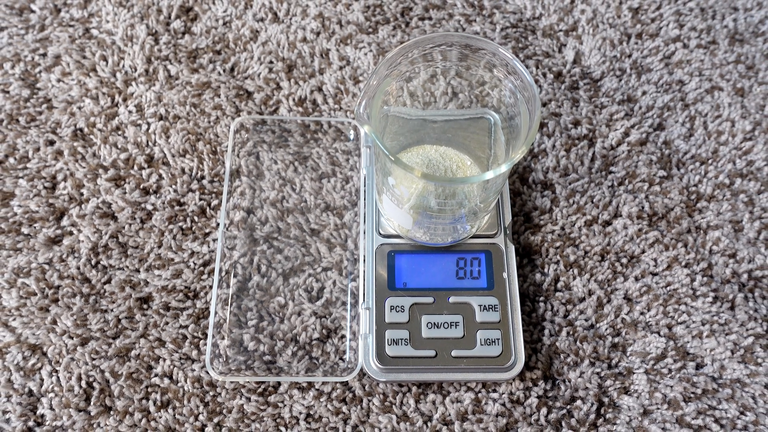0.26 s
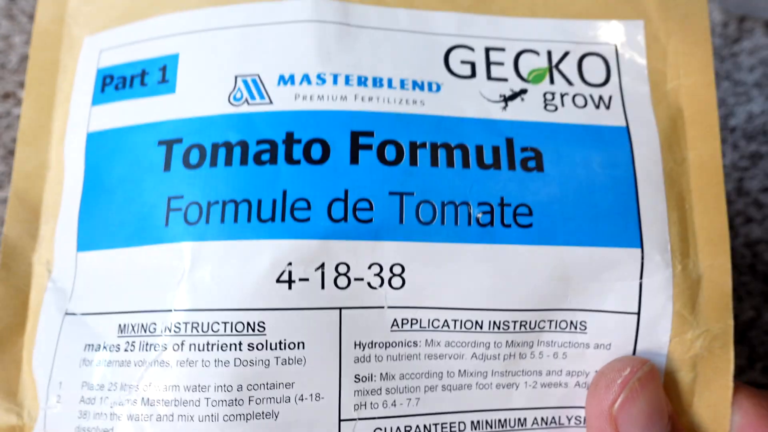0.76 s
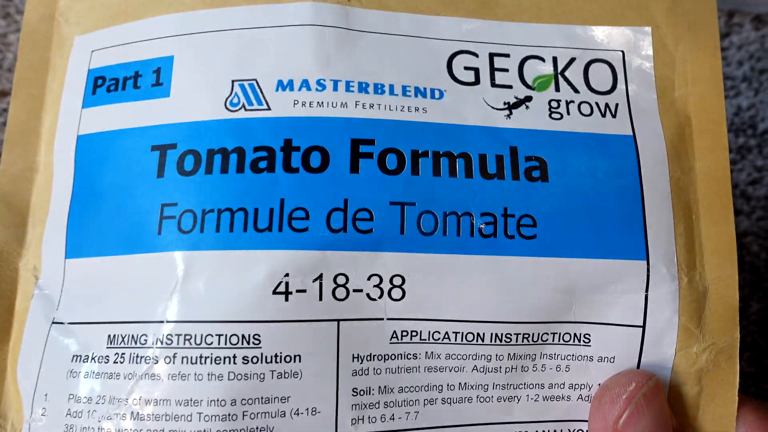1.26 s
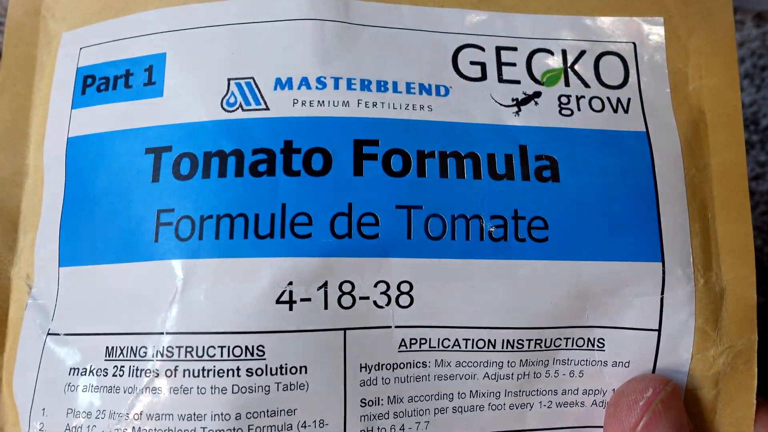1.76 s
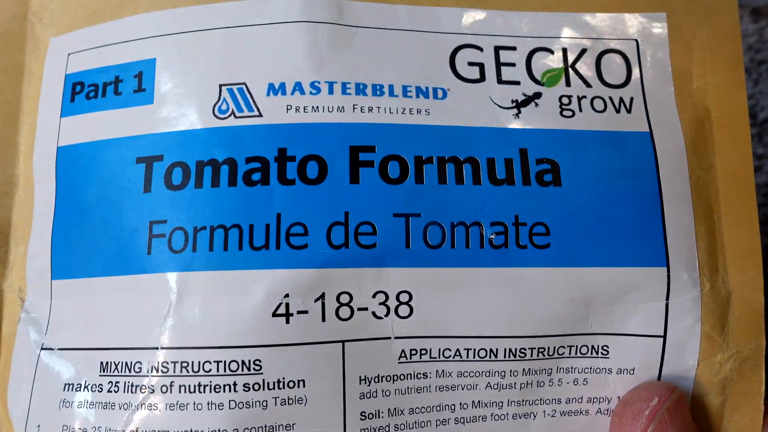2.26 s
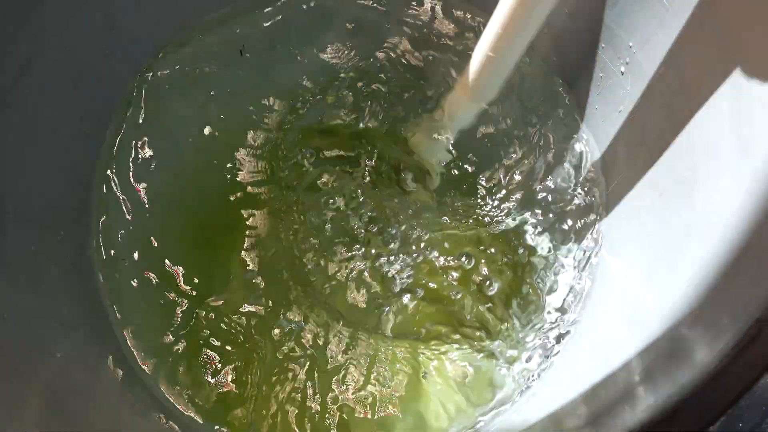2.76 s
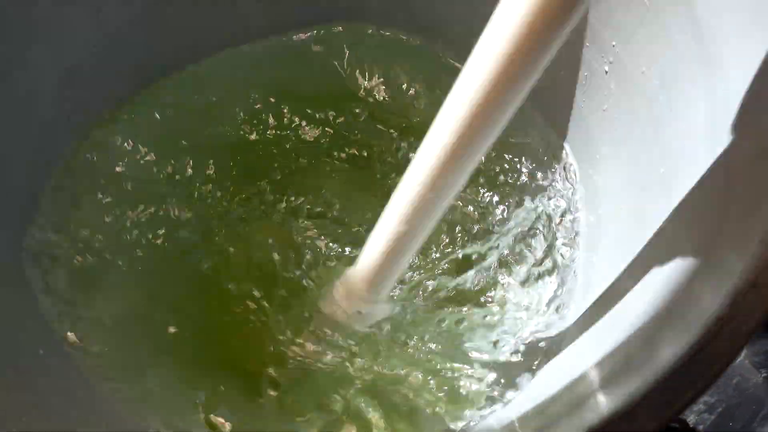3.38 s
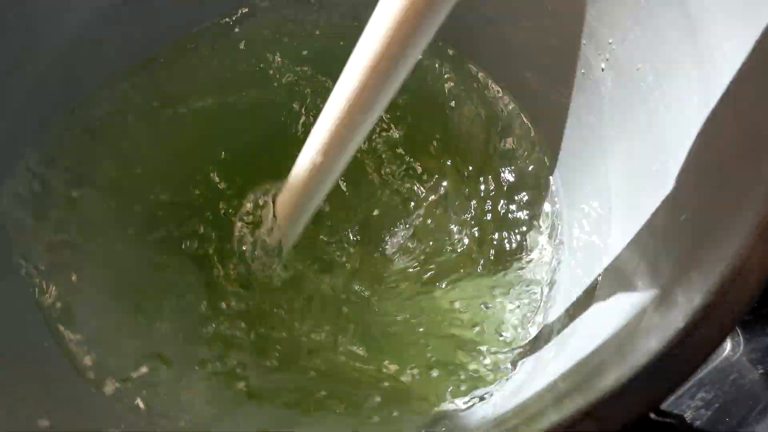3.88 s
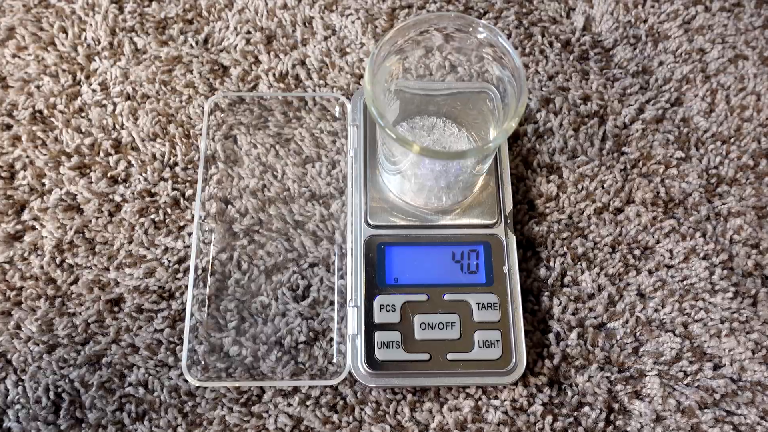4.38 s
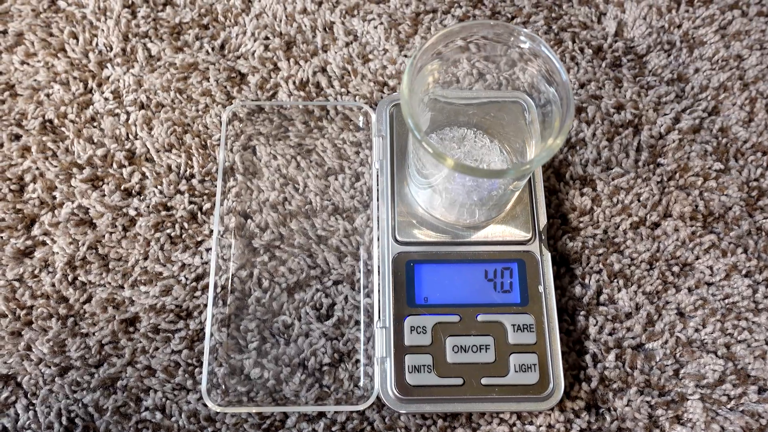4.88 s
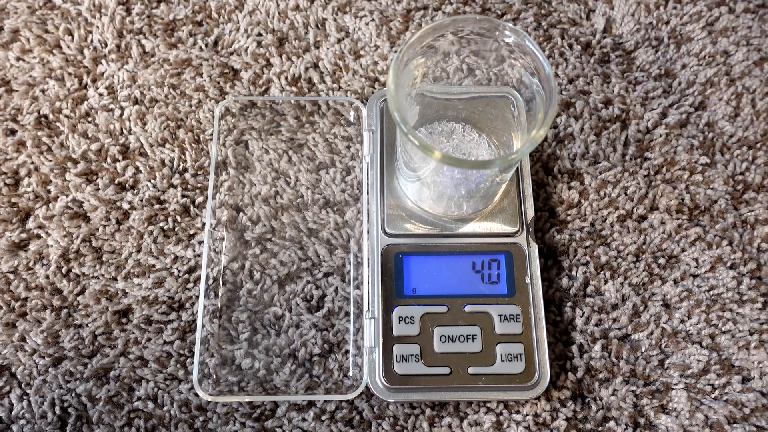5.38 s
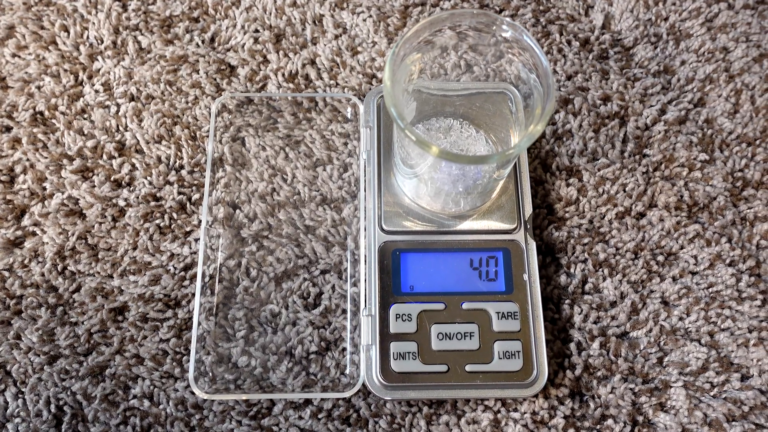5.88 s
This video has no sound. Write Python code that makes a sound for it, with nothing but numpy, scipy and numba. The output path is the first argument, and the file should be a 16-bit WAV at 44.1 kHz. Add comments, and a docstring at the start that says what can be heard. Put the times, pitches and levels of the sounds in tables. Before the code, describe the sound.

The scene opens on a quiet indoor room with low rumbling air and a very faint bird chirp outside. Around 0.4 seconds a paper pouch brushes past with a short dry rustle and a dull knock, fading by about 1 second. Calm room noise follows, with a tiny crease tick at 1.1 and thin distant chirps near 1.35 and 2.1. At 2.4 stirring cuts in abruptly, close and much louder: an opening rush, then irregular slaps, hollow low plops, burbling, ringing bubbles and small bright ticks, all coloured by the pail's short boxy resonance. It stops sharply at 4.4, leaving near silence. Room air rises a little after 5 seconds. From 5.3 paper rustles softly, with snaps at 5.5, a muffled bump at 5.62 and a sharp crack at 5.87. Fine granules tick on glass, clearest around 6.0 at the end.

```python
"""Indoors, plant food is mixed. A paper pouch swings past with a rustle and a bump: friction and impact noise.
A stick then stirs water in a plastic pail: air pockets slap shut and boom, bubbles ring as damped tones,
noise swishes, and the pail adds resonances and short echoes.
Then the quiet room returns, and granules (random impacts) and the pouch (dense tiny slips) start to rustle.
A bird chirps faintly outside in short noise bands, over a low noise of room air."""
import sys
import numpy as np
from scipy import signal
from scipy.fft import rfft, irfft
from scipy.io import wavfile
from numba import njit

SR = 44100
rng = np.random.default_rng(int(sys.argv[2]) if len(sys.argv) > 2 else 0)


def digitize_waveform(pressure):
    """Quantize a signal to 16-bit integers and store it at the path in sys.argv[1].

    Rows of a 2-D input are taken as channels; values are limited to [-1, 1].
    """
    field = np.atleast_2d(pressure).T
    bounded = np.clip(field, -1, 1)
    quanta = np.round(bounded * 32767).astype(np.int16)
    wavfile.write(sys.argv[1], SR, quanta)


N = 270140
T = np.arange(N) / SR  # time in the scene [s]
AGE = T[:SR // 4]  # time since the start of a short sound [s]
STIR_START_S, STIR_END_S = 2.377, 4.379
STIR_RATE_HZ = 2.5  # turns of the stick per second


def undb(db):
    """Level law: decibels to amplitude gain."""
    return 10 ** (np.asarray(db) / 20)


def unit(x):
    """Normalisation to an rms amplitude of 1."""
    return x / np.sqrt(np.mean(x ** 2))


def level_curve(table):
    """Level interpolation: (time [s], level [dB]) points become a gain for every sample."""
    s, db = np.transpose(table)
    return undb(np.interp(T, s, db))


def between(start, end, edge=0.0066):
    """Gating: 1 from start to end, with short linear ramps inside."""
    opening = np.clip((T - start) / edge, 0, 1)
    closing = np.clip((end - T) / edge, 0, 1)
    return opening * closing


def surge(s, rise, fall):
    """Exponential growth up to 1 at time s, then exponential decay."""
    return np.exp(-np.maximum((s - T) / rise, (T - s) / fall))


def swell(seconds):
    """Critically damped envelope: it peaks at 1 after the given time and dies away."""
    return AGE / seconds * np.exp(1 - AGE / seconds)


def add(out, s, sound):
    """Superposition: mix a sound in at time s."""
    i = int(np.clip(s * SR, 0, N - 1))
    out[i:i + len(sound)] += sound[:N - i]


def colour(x, points):
    """Spectral shaping by a (frequency [Hz], level [dB]) curve, falling below its first point; rms 1."""
    hz, db = np.transpose(points)
    f = np.maximum(np.arange(len(x) // 2 + 1) * SR / len(x), 1)
    low_cut = np.minimum(f / hz[0], 1) ** 2
    gain = undb(np.interp(np.log(f), np.log(hz), db)) * low_cut
    return unit(irfft(rfft(x) * gain, len(x)))


def noise(points):
    """Stationary random noise of the given spectrum, rms 1."""
    return colour(rng.standard_normal(N), points)


def patter(rate, spread_db):
    """Random impacts, `rate` per second on average: many small, a few large."""
    size = undb(spread_db * np.minimum(rng.exponential(size=N), 4))
    hits = rng.random(N) < rate / SR
    return unit(hits * size * rng.choice([-1, 1], N))


def bubble(hz, decay, rise=0.041):
    """Bubble resonance: a damped tone whose pitch climbs as the bubble nears the surface."""
    t = AGE[:int(7 * decay * SR) + 2]
    # the pitch gains the share `rise` in each decay time
    tone = np.sin(2 * np.pi * hz * (t + rise * t ** 2 / (2 * decay)))
    return np.exp(-t / decay) * (1 - np.exp(-2 * t * hz)) * tone


def cloud(low_hz, octaves, cycles, spread_db, count):
    """Bubble statistics: random sizes born all through the stirring, many faint, a few loud."""
    out = np.zeros(N)
    for when, pitch, size, life in rng.random((count, 4)):
        hz = min(low_hz * 2 ** (pitch * octaves), SR / 3)
        loud = undb(-spread_db * np.log(size + 0.038))
        birth = STIR_START_S + when * (STIR_END_S - STIR_START_S)
        add(out, birth, loud * bubble(hz, cycles * (.5 + life) / hz))
    return out


# spray spectrum: (frequency [Hz], level [dB])
SPRAY_SPECTRUM = [(1200, -14), (2500, 0.5), (4500, 5.5), (6500, -2.5), (9000, -2), (11000, -13.5),
                  (16000, -15.5)]
# air pockets closing behind the stick; levels are before the trims below:
# (time [s], slap level [dB], boom level [dB], boom pitch [Hz], slap decay [s])
AIR_POCKETS = [(2.385, -30, -21.5, 354, 0.012), (2.421, -17, -26.5, 393, 0.0062),
               (2.48, -15, -16.5, 285, .003), (2.621, -15, -26.5, 274, .0036),
               (2.696, -22.5, -37, 266, 0.0034), (2.721, -12.5, -26.5, 330, 0.00097),
               (2.781, -18.5, -34.5, 245, 0.0037), (2.933, -22, -33.5, 269, 0.0034),
               (3.084, -21, -28.5, 345, 0.0023), (3.214, -27.5, -41.5, 357, .0043),
               (3.265, -37, -43.5, 234, 0.004), (3.449, -13, -23.5, 336, 0.0039),
               (3.506, -21.5, -27.5, 276, 0.0056), (3.561, -11, -27.5, 342, .0032),
               (3.616, -25, -33.5, 345, 0.0033), (3.686, -23.5, -25, 343, 0.0019),
               (3.746, -33.5, -34, 358, 0.0041), (3.805, -26.5, -50, 240, .006),
               (3.854, -14.5, -18.5, 326, 0.0036), (3.962, -11, -23.5, 375, 0.0032),
               (4.03, -25, -39, 334, 0.0031), (4.317, -10.5, -22, 285, 0.003)]


def plops(slap_db=2, boom_db=6, spray_db=-19):
    """Cavity collapse: each pocket shuts with a falling slap and spray; the trapped air then booms."""
    slap_hz, pitch_spread, fall = 1502, .12, .35  # centre pitch, its random spread, depth of the fall
    boom_s, boom_lag_s, spray_s = 0.0019, 0.0023, 0.0014
    out = np.zeros(N)
    for s, db, low_db, low_hz, decay in AIR_POCKETS:
        chance = rng.standard_normal((2, len(AGE)))
        hz = slap_hz * np.exp(pitch_spread * rng.uniform(-1, 1))
        pitch = hz * (1 + fall * (2 * np.exp(-AGE / decay) - 1))
        tone = np.sin(2 * np.pi * np.cumsum(pitch) / SR)
        splash = colour(chance[0], [(hz / 2, -3), (hz, 0), (1.2 * hz, -3), (2.14 * hz, -15), (8 * hz, -35)])
        slap = undb(-7.5) * tone + undb(-6) * splash
        spray = colour(chance[1], SPRAY_SPECTRUM)
        boom = np.sin(2 * np.pi * low_hz * AGE)
        add(out, s, undb(db + slap_db) * swell(decay / 2) * slap)
        add(out, s, undb(db + spray_db) * swell(spray_s) * spray)  # in proportion to the slap
        add(out, s + boom_lag_s, undb(low_db + boom_db) * swell(boom_s) * boom)
    return out


# spectrum of churned water: (frequency [Hz], level [dB])
CHURN_SPECTRUM = [(150, -31), (260, 5.5), (500, -12), (800, -5.5), (1500, -2.5), (2200, -9), (3500, -16),
                  (7000, -37.5)]
# how hard the water rushes round the stick; it slackens between some turns: (time [s], relative level [dB])
FLOW_LEVEL = [(2.38, 14.5), (2.475, 13), (2.5, -2), (2.66, -3), (2.84, -2), (2.96, -5), (3.005, -9),
              (3.06, 3.5), (3.38, -0.5), (3.42, -9), (3.48, -1.5), (3.83, 0), (3.87, -9), (3.93, -2),
              (4.27, 1), (4.31, -8)]
# waves against the stick and the wall: (time of crest [s], relative level [dB], build-up [s])
WAVES = [(2.385, -18, 0.0067), (2.45, -39, 0.025), (2.765, -37, 0.0083), (2.848, -29, 0.0093),
         (2.935, -30, 0.019), (3.365, -33, 0.02), (3.485, -34.5, 0.0097), (3.812, -32.5, 0.025),
         (3.925, -31.5, 0.013), (4.208, -32.5, 0.0027), (4.37, -37.5, 0.014)]


def swirl(churn_db=-3, flow_churn_db=-46, flow_spray_db=-52):
    """Modulated turbulence: flow, waves and wakes drive burbling bubbles in a wash; flow and waves, spray."""
    wave_fall_s, wave_spray_db = 0.018, -12.5
    wake_db, wake_s = -19.5, 0.043  # churn that a plop leaves, relative to its slap; its decay
    flow = level_curve(FLOW_LEVEL)
    swishes = sum(undb(db) * surge(s, rise, wave_fall_s) for s, db, rise in WAVES)
    wakes = sum(undb(db + wake_db) * surge(s, .001, wake_s) for s, db, *_ in AIR_POCKETS)
    # independent drives add in power
    churn_drive = np.hypot(undb(flow_churn_db) * flow, swishes + wakes)
    spray_drive = np.hypot(undb(flow_spray_db) * flow, undb(wave_spray_db) * swishes)
    burble = colour(cloud(low_hz=488.0, octaves=2.7, cycles=6, spread_db=3.5, count=1500), CHURN_SPECTRUM)
    ticks = unit(cloud(low_hz=2240, octaves=2.4, cycles=2.4, spread_db=7.0, count=900))
    water = undb(-4.0) * burble + undb(-7) * noise(CHURN_SPECTRUM)  # over a soft wash
    spray = undb(-5.0) * ticks + undb(-2) * noise(SPRAY_SPECTRUM)  # over a fine mist
    return undb(churn_db) * churn_drive * water + spray_drive * spray


# single ringing bubbles: (time [s], pitch [Hz], level [dB], decay [s])
RINGING_BUBBLES = [(2.388, 830, -8.5, .007), (2.4197, 1990, -14, .009), (2.427, 1046, -9.5, .0076),
                   (2.463, 10160, -19, .0011), (2.463, 8360, -17.5, .0011), (2.552, 2650, -20, .0017),
                   (2.574, 910, -44, .018), (2.844, 368, -22.5, .005), (2.941, 937, -31.5, .004),
                   (3.007, 2350, -44, .005), (3.028, 2320, -25.5, .0024), (3.043, 7300, -19, .0004),
                   (3.045, 1566, -34.5, .012), (3.066, 3650, -14, .001), (3.067, 4840, -20, .0012),
                   (3.072, 1030, -28.5, .012), (3.345, 804, -27, .011), (3.367, 788, -25.5, .011),
                   (3.436, 5700, -22, .0007), (3.47, 2540, -28.5, .007), (3.508, 806, -17.5, .004),
                   (3.5455, 3860, -14.5, .001), (3.5472, 1450, -17.5, .001), (3.803, 822, -24.5, .0085),
                   (3.889, 340, -29.5, .006), (3.957, 1310, -22, .0017), (4.004, 3940, -14, .0005),
                   (4.020, 13200, -19.5, .00035), (4.229, 840, -26, .0087), (4.285, 8500, -17, .0012)]


def single_bubbles(rise=.05):
    """Free oscillation: separate bubbles each ring at their own pitch."""
    out = np.zeros(N)
    for s, hz, db, decay in RINGING_BUBBLES:
        add(out, s, undb(db) * bubble(hz, decay, rise))
    return out


# air and wall resonances of the pail: (frequency [Hz], gain [dB], time to fall by 60 dB [s])
PAIL_MODES = [(218, -6.5, 0.14), (261.8, 13, 0.19), (287, 5.5, 0.19), (328, 9.5, 0.32), (358.8, 11.5, 0.26),
              (380.6, 10, 0.14), (488, 9, 0.21), (570, 6.5, 0.24), (803, 8.5, 0.058), (1190, -24, .08),
              (1500, 5, 0.03), (1695, 0, 0.036), (2200, -3, 0.04)]


def pail_resonance(x, slosh=0.02):
    """Modal resonance: the pail's modes ring on, their pitch swaying as the water tilts with each turn."""
    out = 0
    for hz, db, t60 in PAIL_MODES:
        sway = 1 + slosh * np.sin(2 * np.pi * (STIR_RATE_HZ * T + rng.random()))
        turn = np.exp(2j * np.pi * hz * np.cumsum(sway) / SR)
        loss = np.log(1000) / (t60 * SR)
        # shift the mode down to 0 Hz, smooth it there, shift it back
        smooth = signal.lfilter([loss], [1, loss - 1], x / turn)
        out = out + undb(db) * 2 * np.real(turn * smooth)
    return out


def wall_echoes(x, wall_s=0.0052):
    """Diffuse reflection: the sound bounces between the pail's walls as a short decaying scatter."""
    walls = rng.standard_normal(len(AGE)) * np.exp(-AGE / wall_s) * (AGE > .001)
    return signal.fftconvolve(x, walls / np.linalg.norm(walls))[:N]


def stirring():
    """Source and resonator: the water sounds excite the pail's walls and air."""
    water = plops() + swirl() + single_bubbles()
    echoes = wall_echoes(water)
    in_pail = undb(-2.5) * water + pail_resonance(water) + undb(-9) * echoes
    return in_pail * between(STIR_START_S, STIR_END_S)


@njit
def follow(x, attack, release):
    """Envelope detection: attack and release are shares per sample."""
    out, level = np.empty(len(x)), 0.
    for i in range(len(x)):
        level += (abs(x[i]) - level) * (attack if abs(x[i]) > level else release)
        out[i] = level
    return out


def limit(x, limit_db=-16.0, attack_s=0.00046, release_s=0.024):
    """Peak limiting: the gain ducks while the envelope exceeds the limit, then recovers."""
    level = follow(x, min(1 / (attack_s * SR), 1.), 1 / (release_s * SR))
    return x * undb(limit_db) / np.maximum(level, undb(limit_db))


def rubs(table):
    """Stroke superposition: summed envelopes of strokes over paper."""
    return sum(undb(db) * surge(s, rise, fall) for s, db, rise, fall in table)


# the pouch brushes past: (time of peak [s], level [dB], build-up [s], decay [s])
SWING_STROKES = [(.425, -42, 0.069, .03), (.522, -45, 0.048, 0.071)]
# spectrum of the brush: (frequency [Hz], level [dB])
SWING_SPECTRUM = [(400, -2), (1000, 0.5), (2000, -3), (4000, -4), (6000, -9.5), (8500, -6.5),
                  (11500, -17.5), (15000, -17.5)]
# firmer rubs of the pouch: (time of peak [s], level [dB], build-up [s], decay [s])
RUSTLE_STROKES = [(5.322, -42, 0.058, 0.021), (5.635, -33.5, 0.0096, 0.029), (5.78, -42, 0.028, 0.024),
                  (5.862, -31, 0.014, 0.014)]
# spectrum of the rubs: (frequency [Hz], level [dB])
RUSTLE_SPECTRUM = [(50, 8.5), (130, 6), (450, 0.5), (1000, -1), (2200, -0.5), (4200, -7), (8500, -8),
                   (11500, -18.5), (16000, -25)]


def paper_friction():
    """Stick-slip friction: paper rubs in dense tiny slips, first swung past, later handled."""
    steady_start_s, steady_attack_s, steady_db = 5.39, 0.12, -41.5
    swing_drive = rubs(SWING_STROKES) * between(0.379, 0.96)
    swing = swing_drive * colour(patter(rate=15000, spread_db=3.5), SWING_SPECTRUM)
    steady = undb(steady_db) * np.clip((T - steady_start_s) / steady_attack_s, 0, 1)
    handling = (steady + rubs(RUSTLE_STROKES)) * between(5.295, 6.2)
    return swing + handling * colour(patter(rate=9000, spread_db=3.5), RUSTLE_SPECTRUM)


# creases snapping in the pouch: (time [s], level [dB], decay [s])
CREASE_SNAPS = [(1.112, -48, 0.0013), (5.432, -37.5, 0.0014), (5.53, -24.5, 0.0011), (5.622, -32, 0.0058),
                (5.636, -29.5, 0.0067), (5.8723, -11.5, 0.00097), (5.988, -42, 0.00092),
                (6.048, -23, 0.00088)]


def crackles():
    """Impulsive release: each crease snaps as a decaying burst of bright noise."""
    out = np.zeros(N)
    for s, db, decay in CREASE_SNAPS:
        burst = colour(rng.standard_normal(len(AGE)), [(500, -2), (3000, 0), (8000, -2), (16000, -10)])
        add(out, s, undb(db) * np.exp(-AGE / decay) * burst)
    return out


# dull bumps of the hand: (time of centre [s], pitch [Hz], level [dB], contact time [s])
HAND_BUMPS = [(0.4265, 970, -3.5, 0.00041), (.428, 740, -18.5, 0.0016), (0.431, 90.6, -20.5, 0.0054),
              (5.623, 620, -16, 0.00092), (5.626, 400, -19.5, 0.00063), (5.8739, 1800, 0.5, 0.00013)]


def bumps():
    """Soft contact: the pressure swings up and back under a bell-shaped envelope."""
    out = np.zeros(N)
    for s, hz, db, seconds in HAND_BUMPS:
        t = AGE - 3 * seconds  # 0 at the centre of the bump
        push = np.exp(-(t / seconds) ** 2) * np.sin(2 * np.pi * hz * t)
        add(out, s - 3 * seconds, undb(db) * push)
    return out


def pouch():
    """Superposition of the pouch's friction, its snapping creases and the bumps of the hand."""
    return paper_friction() + crackles() + bumps()


# level of the trickling grains: (time [s], level [dB])
GRANULE_LEVEL = [(5.4, -61), (5.7, -51.5), (5.92, -46.5), (6.03, -34), (6.13, -42)]
# spectrum of grains on glass: (frequency [Hz], level [dB])
GRANULE_SPECTRUM = [(1000, -28), (2100, 0), (2700, -5.5), (3550, 3), (4600, -7.5), (5600, -10.5),
                    (7000, -12), (12000, -25)]


def granules(rate=700, spread_db=5.0):
    """Random impact noise: dry grains trickle and tick against a glass beaker."""
    ticks = colour(patter(rate, spread_db), GRANULE_SPECTRUM)
    return level_curve(GRANULE_LEVEL) * between(5.4, 6.2) * ticks


# calls of a distant bird: (time [s], pitch [Hz], level [dB])
BIRD_CALLS = [(0.049, 5200, -57), (1.353, 5750, -55.5), (2.084, 5270, -56.5), (4.67, 6240, -78)]


def bird(attack_s=0.0028, echo_s=0.039):
    """Narrow-band noise: short thin chirps with a decay smeared by distance."""
    out = np.zeros(N)
    for s, hz, db in BIRD_CALLS:
        band = [(.85 * hz, -35), (.95 * hz, -8), (hz, 0), (1.08 * hz, -9), (1.4 * hz, -17), (2 * hz, -36)]
        call = colour(rng.standard_normal(len(AGE)), band)
        add(out, s, undb(db) * (1 - np.exp(-AGE / attack_s)) * np.exp(-AGE / echo_s) * call)
    return out


# room air before and after the stirring: (time [s], relative level [dB])
ROOM_LEVEL = [(0, -40.5), (.35, -40.5), (.6, -46.5), (1.05, -48), (1.35, -40), (2.35, -40.5), (4.4, -60.5),
              (5.02, -62), (5.15, -51), (5.35, -38.5), (6.1, -51)]
# spectrum of the murmur: (frequency [Hz], level [dB])
MURMUR_SPECTRUM = [(47, -31), (80, -2), (186, 1), (265, -11.5), (361, -2), (395, -9.5), (802, -16),
                   (1860, -30.5), (2180, -30), (4520, -42.5), (5770, -43.5), (7050, -48), (14300, -61),
                   (16000, -58.5)]
# spectrum of the rumble: (frequency [Hz], level [dB])
RUMBLE_SPECTRUM = [(11, 27), (14, 28), (21, 13.5), (32, 22), (45, 3.5), (70, -5), (130, -38.5)]


def room(rumble_db=5, murmur_db=-1, pail_rumble_db=-53, pail_murmur_db=-52):
    """Background noise: low indoor air noise, steady and faint by the pail."""
    by_pail = between(STIR_START_S, STIR_END_S)
    # away from the pail the rumble and the murmur share one level curve
    elsewhere = level_curve(ROOM_LEVEL) * (1 - by_pail)
    rumble = elsewhere + undb(pail_rumble_db) * by_pail
    murmur = elsewhere + undb(pail_murmur_db) * by_pail
    low = undb(rumble_db) * rumble * noise(RUMBLE_SPECTRUM)
    return low + undb(murmur_db) * murmur * noise(MURMUR_SPECTRUM)


def scene():
    """Linear superposition at one microphone; only the close water sounds are limited."""
    return (limit(stirring()) + pouch() + granules() + bird() + room())[None]


def record(dry):
    """Band limitation: the recorder cuts the top with a steep low-pass at 15900 Hz."""
    low_pass = signal.ellip(8, .2, 70, 15900, fs=SR, output="sos")
    return signal.sosfilt(low_pass, dry)


dry = scene()
out = record(dry)
digitize_waveform(out)
```